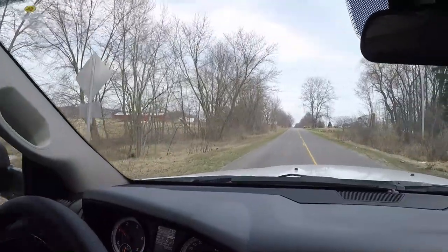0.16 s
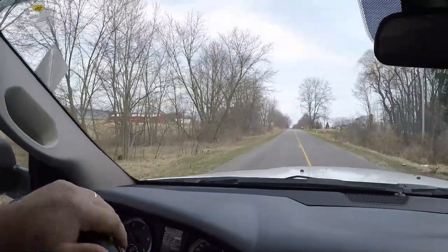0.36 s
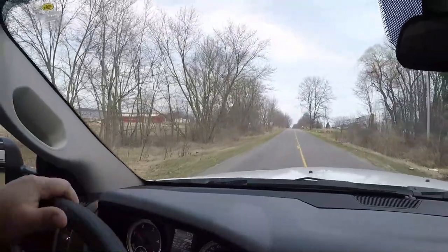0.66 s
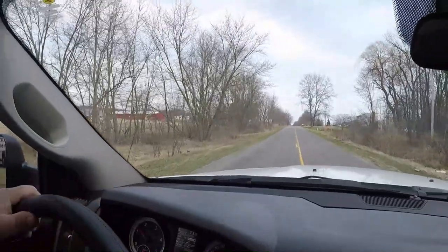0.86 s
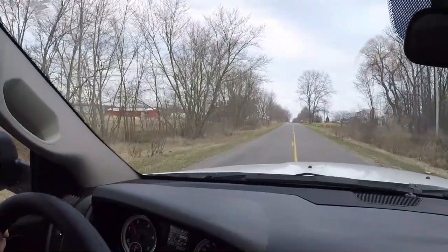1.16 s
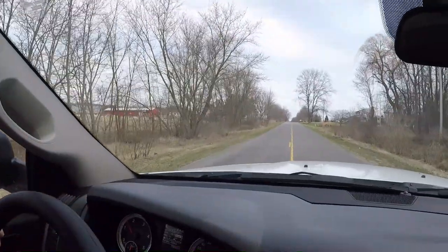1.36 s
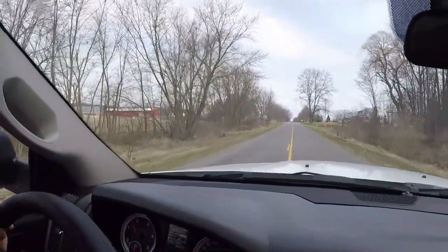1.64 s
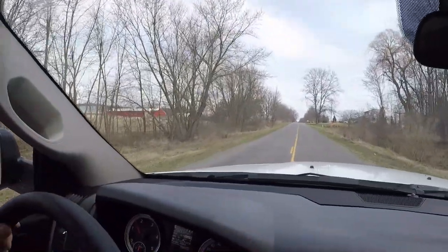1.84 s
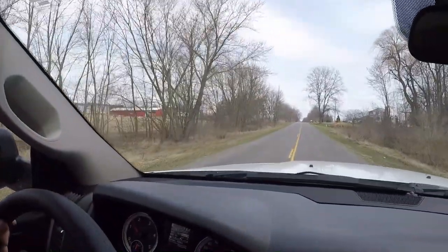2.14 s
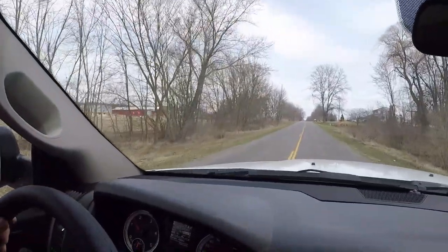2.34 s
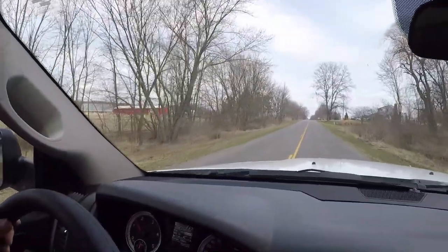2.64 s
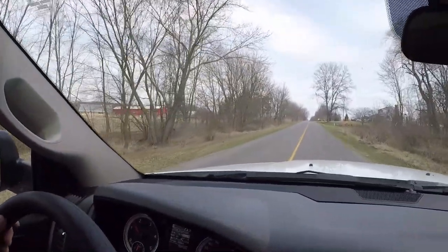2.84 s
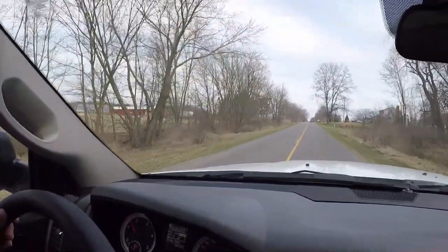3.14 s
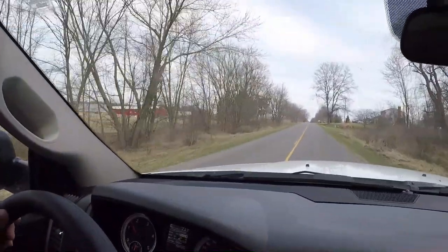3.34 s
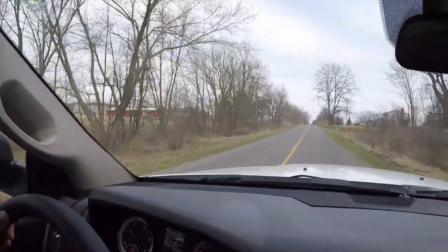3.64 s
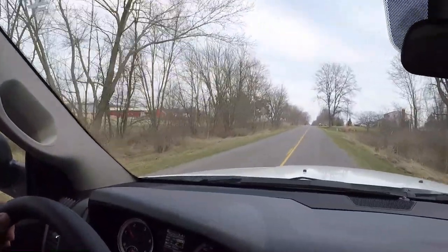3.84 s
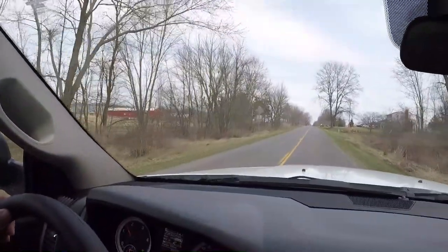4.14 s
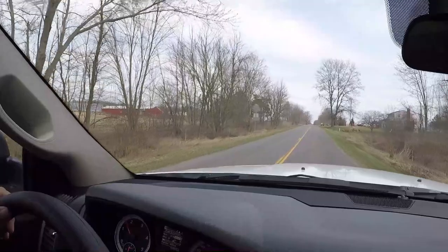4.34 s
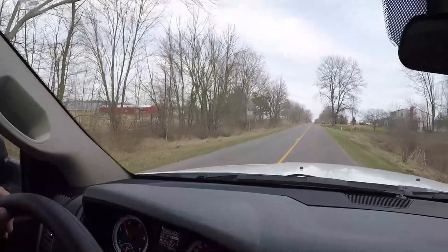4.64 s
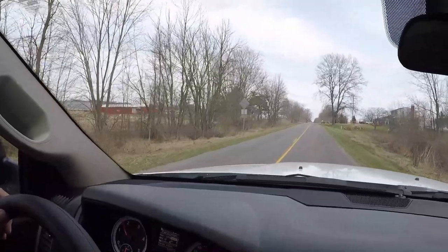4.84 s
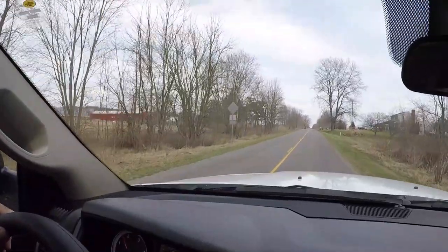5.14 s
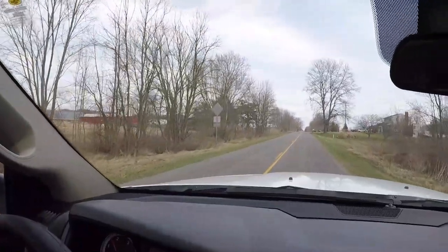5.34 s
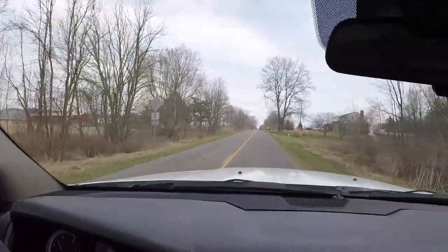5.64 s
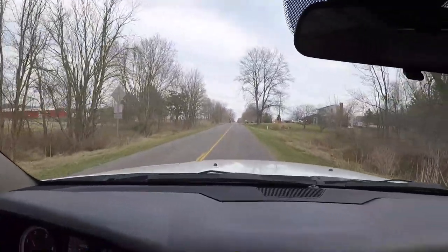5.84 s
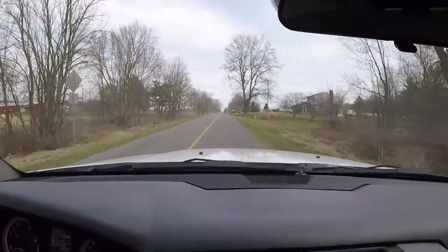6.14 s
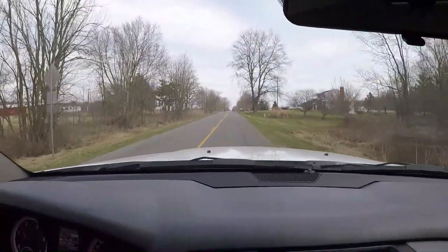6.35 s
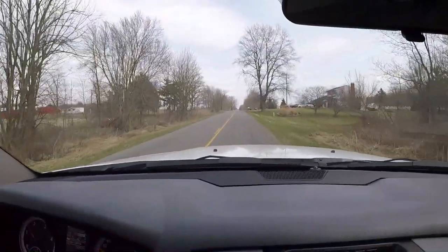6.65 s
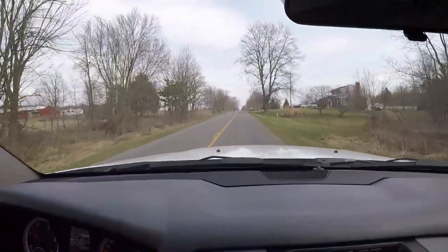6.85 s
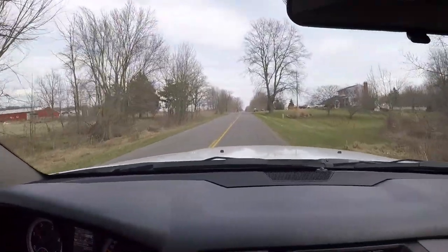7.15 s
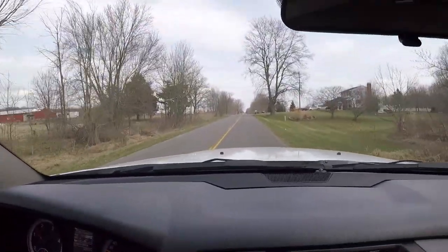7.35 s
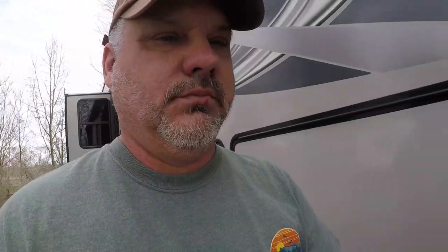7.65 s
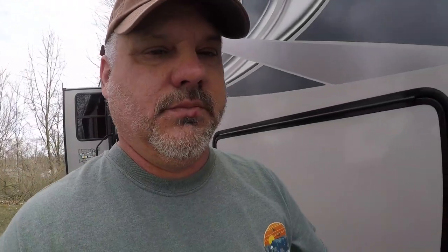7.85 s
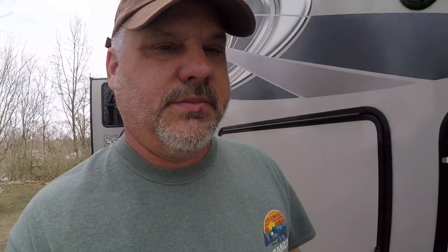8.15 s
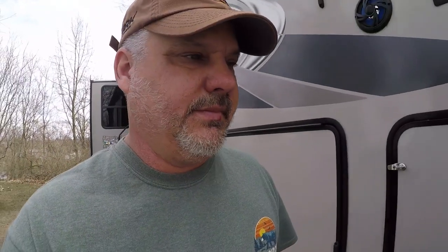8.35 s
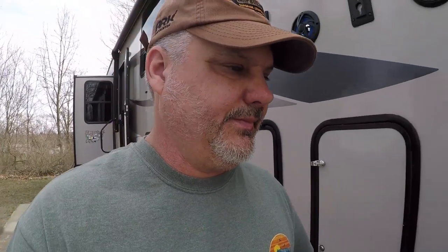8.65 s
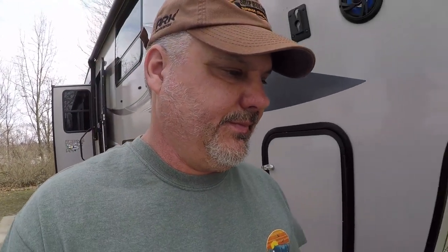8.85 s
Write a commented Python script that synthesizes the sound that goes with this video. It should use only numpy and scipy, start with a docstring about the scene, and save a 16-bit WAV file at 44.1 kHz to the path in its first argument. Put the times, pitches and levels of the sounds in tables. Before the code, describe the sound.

From 0 to about 7.5 s we are inside a pickup cab on pavement, loud and bass-heavy in stereo. The engine's low hum rises until 1.4 s, dips at a gear change, climbs slowly to about 5.4 s, drops again and cruises steadily. Dense tyre rumble and subdued hiss run throughout, with the hiss slightly stronger after 5.7 s. Faint plastic clicks fall between 0.7 and 1.1 s, clearer ones at 2.1, 2.5, 2.6 and 3.0 s, and a small one at 6.7 s. At 2.2 s a rough scuff drags and knocks near the microphone. Low body booms swell irregularly, strongest from 6.2 s; a faint high whine passes around 7.1 s. At 7.5 s a hard cut opens a far quieter mono yard, fading in: soft air, low wind thumps, brighter gusting after 8.4 s, distant falling bird whistles with echoes every quarter second or so, and tiny close ticks around 8.3-8.6 s.

```python
"""Inside the cab of a pickup truck on a paved road: engine tones, tyre rumble, hiss and a booming body.
The engine is sines on multiples of its shaft speed, the road coloured noise, each boom a short low sine.
Plastic clicks ring in short noise bursts, then one rough scuff near the camera drags and knocks; late on,
a faint whine. A hard cut leads to a quiet yard fading in, in mono: noise puffs and thumps of wind, a far
bird of falling sines with an echo, and small ticks."""
import sys
import numpy as np
from scipy import signal
from scipy.io import wavfile
from scipy.ndimage import uniform_filter1d

SR = 44100
rng = np.random.default_rng(int(sys.argv[2]) if len(sys.argv) > 2 else 0)


def log_audio(samples):
    """Write samples as a 16-bit WAV file to the path given in sys.argv[1]."""
    # one column per channel
    frames = np.atleast_2d(samples).T
    # limit to full scale, then quantise
    limited = np.clip(frames, -1, 1)
    pcm = np.round(limited * 32767).astype(np.int16)
    wavfile.write(sys.argv[1], SR, pcm)


def undo_db(level):
    """Turn decibels back into plain size, where 20 dB means ten times bigger."""
    steps = np.asarray(level, float) / 20
    return 10 ** steps


N = 396459
CUT_S = 7.4824  # the cab stops and the yard starts, in seconds

# How the cab's sound leans sideways. Each row: frequency in Hz, left over right in dB.
SIDE_LEAN = [(60, 2.5), (110, 3.5), (200, 2.5), (370, 2.5), (680, -1), (1260, -4.5), (2310, -3),
             (4240, -0.5), (7780, -0.5), (14300, -4.5)]


def evened(x):
    """Scales a sound to rms 1."""
    return x / np.sqrt(np.mean(x ** 2) + 1e-20)


def read(points, hz):
    """Reads a table of (Hz, value) between its rows, along a logarithmic pitch scale."""
    f, value = np.transpose(points)
    return np.interp(np.log(hz + 1), np.log(f + 1), value)


def curve(rows):
    """Draws straight lines in time through each column of a table that starts with seconds."""
    s, *columns = np.transpose(rows)
    return [np.interp(np.arange(N) / SR, s, c) for c in columns]


def add(mix, s, sound):
    """Lays a sound into the mix from second s on."""
    part = mix[..., round(s * SR):][..., :sound.shape[-1]]
    part += sound[..., :part.shape[-1]]


def wander(hz):
    """Slow chance drift: straight lines between random points, hz points a second."""
    knots = rng.standard_normal(300)
    return np.interp(np.arange(N) / SR * hz, np.arange(len(knots)), knots)


def band(x, hz, width):
    """Keeps a band of the given width around hz, with gentle slopes."""
    edges = [max(hz - width / 2, 10), hz + width / 2]
    return signal.sosfilt(signal.butter(1, edges, "band", fs=SR, output="sos"), x)


def twice(x, hz, width):
    """Filters a band twice for steeper slopes and scales it to rms 1."""
    return evened(band(band(x, hz, width), hz, width))


def noise(colour, size, patchy_db, count=N):
    """Stereo noise of a given colour with drifting patches; the mean of both channels has rms 1."""
    # Each row: frequency in Hz, likeness of left and right (1 is identical).
    likeness = [(60, 0.94), (99, 1), (160, 0.94), (270, 0.96), (440, 0.88), (720, 0.13), (1190, 0.07),
                (1950, 0.23), (3210, 0.6), (5290, 0.22), (8690, -0.27), (14300, 0.05)]
    frames, hz = 4 * count // size + 5, np.fft.rfftfreq(size, 1 / SR)
    a, b, c, d, patches = rng.standard_normal((frames, len(hz), 5)).T
    # smooth the patches across frequency, then across time
    patches = uniform_filter1d(patches, size=9, axis=0)
    patches = evened(uniform_filter1d(patches, size=7, axis=1))
    same = np.clip(read(likeness, hz), -1, 1)[:, None]
    left = a + 1j * b
    right = same * left + np.sqrt(1 - same ** 2) * (c + 1j * d)
    lean_db = read(SIDE_LEAN, hz)[:, None] / 2
    z = np.array([left, right]) * undo_db([lean_db, -lean_db])
    # the colour holds for the mean of both channels
    mid_power = undo_db(2 * lean_db) / 2 + undo_db(-2 * lean_db) / 2 + same
    z *= undo_db(read(colour, hz)[:, None] + patchy_db * patches) / np.sqrt(mid_power)
    out = signal.istft(z, nperseg=size, noverlap=3 * size // 4)[1][:, :count]
    return out / np.sqrt(np.mean(out.mean(0) ** 2))


def engine():
    """Sines on multiples of the shaft speed, loudest on a resonance of the cab and under a hard pull."""
    # The engine pulls, drops at two gear changes and cruises. Each row: time in seconds, shaft speed in Hz.
    shaft_speed = [(0, 34.79), (.5, 36.2), (1.2, 40.15), (1.41, 40.4), (1.71, 36.0), (1.87, 36.25),
                   (2.25, 38.7), (3.5, 40.1), (4.5, 40.6), (5.38, 41.85), (5.53, 41.8), (5.8, 38.35),
                   (6.2, 38.6), (7.5, 38.65)]
    # Each row: multiple of the shaft speed, level in dB, shaft speed in Hz where the cab answers best,
    # half width of that resonance in Hz of shaft speed.
    orders = [(2, -20.5, 39.8, 8), (3, -34.5, 39, 5.5), (4, -17, 35.6, 1.96), (5, -33, 41.4, 3),
              (6, -32, 40.3, 1.2), (7, -34, 38, 4.5), (8, -42.5, 32, 4.9), (10, -38, 42.5, 4),
              (11, -46.5, 30, 3), (12, -42.5, 41.2, 2.6), (14, -50, 36, 3), (16, -48, 37.2, 1.9),
              (20, -58, 29, 4.3)]
    flywheel_s = 0.1  # the flywheel smooths the speed over this time
    leak_db = -12.5  # what still reaches the cab away from a resonance
    pull_db, full_pull_hz_per_s = 0.42, 3.5  # a hard pull lifts each order by pull_db times its multiple
    hz = uniform_filter1d(curve(shaft_speed)[0], round(flywheel_s * SR))
    turn = 2 * np.pi * np.cumsum(hz * (1 + 0.0012 * wander(11))) / SR
    pull = np.clip(np.gradient(hz) * SR / full_pull_hz_per_s, 0, 1)
    out = np.zeros((2, N))
    for k, db, best_hz, width in orders:
        resonance = (1 + ((hz - best_hz) / width) ** 2) ** -2.0
        answer_db = 10 * np.log10(resonance + undo_db(2 * leak_db))
        level_db = db + answer_db + pull_db * k * pull + 0.69 * wander(6.1)
        tone = np.sqrt(2) * np.sin(round(k) * turn + 2 * np.pi * rng.random())
        lean_db = read(SIDE_LEAN, best_hz * k) / 2
        out += undo_db([[lean_db], [-lean_db]]) * undo_db(level_db) * tone
    return out


def road():
    """Noise as low shake, tyre rumble and hiss; the last two also ring the tyres' air and the cab panels."""
    # Low shake around the boom. Each row: frequency in Hz, relative strength in dB per Hz.
    shake_colour = [(7.1, -26.5), (12, 10.5), (32, -2.5), (70, -9.5), (91, -35.5), (150, -120)]
    # Tyres heard through the frame. Each row: frequency in Hz, relative strength in dB per Hz.
    rumble_colour = [(29, -41.5), (50, 1), (81, -3.5), (118, -2), (162, -10.5), (185, -16.5), (238, -11),
                     (334, -15), (368, -18), (410, -18), (597, -28.5), (673, -26), (900, -42),
                     (1170, -75.5), (1980, -120)]
    # Tread and airflow. Each row: frequency in Hz, relative strength in dB per Hz.
    hiss_colour = [(410, -31.5), (700, -5), (975, -8.5), (1240, -6.5), (1600, -14.5), (2100, -15.5),
                   (2260, -15.5), (3070, -18.5), (3720, -23.5), (4120, -22.5), (5120, -28), (6040, -23),
                   (7600, -24.5), (12300, -46.5), (14800, -57.5)]
    # How coarse the paving is. Each row: time in seconds, lift of the rumble in dB.
    paving = [(0, -0.5), (2, 1), (4.4, 1.5), (5.4, -0.5), (6.3, 0), (7.5, -0.5)]
    # Tyre air and cab panels. Each row: frequency in Hz, width in Hz, level in dB.
    cavities = [(123, 45, -30.5), (238.7, 42, -38), (328, 34, -44.5), (1159, 78, -58), (3085, 120, -65),
                (7750, 210, -65.5)]
    shake_db, rumble_db, hiss_db = -17.5, -17.5, -38.5
    hiss_follows = 0.52  # share of the paving's dB that the hiss follows
    hiss_sag_db_per_s = -0.2671
    # the microphone turns toward the windscreen and hears more hiss
    turn_s, turn_length_s, turn_db = 5.7, 0.36, 2.1
    t = np.arange(N) / SR
    coarse_db, = curve(paving)
    shake = undo_db(shake_db) * noise(shake_colour, size=8192, patchy_db=0.5)
    rumble_level_db = rumble_db + coarse_db + 0.41 * wander(3)
    rumble = undo_db(rumble_level_db) * noise(rumble_colour, size=4096, patchy_db=0.5)
    turned = np.clip((t - turn_s) / turn_length_s, 0, 1)
    hiss_level_db = hiss_db + hiss_follows * coarse_db + hiss_sag_db_per_s * t
    hiss_level_db += turn_db * turned + 0.5 * wander(10)
    hiss = undo_db(hiss_level_db) * noise(hiss_colour, size=1024, patchy_db=1.05)
    out = shake + rumble + hiss
    for hz, width, db in cavities:
        out += undo_db(db + 1.0 * wander(1.2)) * twice(rumble + hiss, hz, width)
    return out


def boom():
    """Waves in the paving set the body booming on its springs: a swelling and fading low sine for each."""
    # Each row: time of the peak in seconds, peak level in dB, frequency in Hz,
    # time from silence to the peak and again to silence in seconds.
    waves = [(0.875, -19, 26.4, 0.36), (1.148, -26, 29.6, 0.17), (1.805, -16, 28.9, 0.33),
             (2.62, -18, 26.5, 0.26), (3.208, -21.5, 28.6, .4), (3.698, -12, 35.6, 0.12),
             (3.969, -19, 26.4, 0.064), (4.702, -21, 26.8, .4), (4.98, -15.5, 32.06, 0.59),
             (5.556, -18.5, 40.5, 0.45), (5.802, -17.5, 28, 0.61), (6.222, -13.5, 26.3, 0.39),
             (6.532, -11.5, 31.5, 0.29), (6.898, -10.5, 25.85, 0.28), (7.24, -9.5, 24.4, 0.22)]
    out = np.zeros(N)
    for s, db, hz, length in waves:
        u = np.arange(-length, length, 1 / SR)
        tone = np.sqrt(2) * np.sin(2 * np.pi * (hz * u + rng.random()))
        add(out, s - length, undo_db(db) * np.hanning(len(u)) * tone)
    lean_db = SIDE_LEAN[0][1] / 2
    return undo_db([[lean_db], [-lean_db]]) * out


def clicks():
    """A sharp snap, then its scattered reflections in the cab, through the plastic's resonances."""
    # Each row: start in seconds, level in dB, left over right in dB, time to fall by 60 dB in seconds.
    click_rows = [(0.7187, -54, 11, 0.044), (0.7787, -51.5, 10, 0.054), (0.92, -47.5, 3, 0.087),
                  (1.0844, -44.5, -2, 0.045), (2.1326, -35.5, 1, 0.05), (2.5343, -37, 1.5, 0.086),
                  (2.586, -37, 5, 0.054), (3.016, -41.5, 5, 0.08), (6.709, -46.5, 1, 0.071)]
    # Resonances of the plastic. Each row: frequency in Hz, width in Hz, relative level in dB.
    plastic = [(1700, 1400, 0.5), (2900, 1300, -4.5), (3950, 1000, 1.5), (5890, 1100, 4.5),
               (6850, 1000, 3.5), (9770, 2000, -11)]
    out, t = np.zeros((2, N)), np.arange(4410) / SR
    for s, db, lean_db, t60 in click_rows:
        burst = rng.standard_normal((2, len(t)))
        ring = sum(undo_db(mode_db) * twice(burst, hz, width) for hz, width, mode_db in plastic)
        shape = undo_db(db - 60 * t / t60) * np.minimum(t / 0.0007, 1)
        add(out, s, ring * shape * undo_db([[lean_db / 2], [-lean_db / 2]]))
    return out


def scuff():
    """A surface drags in a few jerks: each knocks the mount, with lumpy noise below and grit above."""
    # Each row: peak time in seconds, level in dB, rise before it in seconds, grit over that level in dB.
    jerks = [(2.204, -23, 0.034, -22.5), (2.214, -11.5, 0.0044, -5.5), (2.228, -19, .0069, -0.5),
             (2.242, -14, 0.012, -4), (2.264, -13, 0.0095, -2), (2.282, -23.5, .0034, -5)]
    # The rubbing noise. Each row: frequency in Hz, relative strength in dB per Hz.
    rub_colour = [(90, -40), (150, -13.5), (280, -9.5), (556, -15.5), (830, -20), (1060, -23), (1250, -28),
                  (1550, -26), (2500, -30), (4500, -35.5), (6000, -37), (8500, -36), (10200, -49.5),
                  (12000, -83.5)]
    # Ringing of the camera mount. Each row: frequency in Hz, relative level in dB,
    # time to fall by 60 dB in seconds.
    mount = [(133.5, 2.5, 0.071), (289, -3, 0.062), (537, -11.5, 0.092), (890, -19.5, 0.048),
             (1090, -24.5, 0.2), (1544, -18.5, 0.062), (2060, -25.5, 0.064)]
    jerk_t60_s, knock_db = 0.11, 10.5
    t = np.arange(N) / SR
    ring_s = t[:6000]
    push, grit, knocks = np.zeros(N), np.zeros(N), np.zeros(N)
    for s, db, rise, grit_db in jerks:
        fall_db = 60 * np.clip(t - s, 0, None) / jerk_t60_s
        power = undo_db(db - fall_db) ** 2 * np.clip(1 + (t - s) / rise, 0, 1) ** 2
        push += power
        grit += power * undo_db(grit_db) ** 2
        for hz, mode_db, mode_t60 in mount:
            spread, sway, turn = rng.standard_normal(3)  # no two knocks ring alike
            ring = np.sin(2 * np.pi * (hz * (1 + 0.022 * sway) * ring_s + turn))
            ring *= np.minimum(ring_s / 0.0015, 1)
            add(knocks, s - 0.002, undo_db(db + mode_db + 1.8 * spread - 60 * ring_s / mode_t60) * ring)
    rub = noise(rub_colour, size=256, patchy_db=2.5, count=N // 3)
    rub = np.pad(rub, [(0, 0), (0, N - N // 3)])
    low = signal.sosfiltfilt(signal.butter(2, 3000, fs=SR, output="sos"), rub)
    rubbing = np.sqrt(push) * low + np.sqrt(grit) * (rub - low)
    # the knocks sound alike in both channels, slightly louder on the left
    return rubbing + undo_db(knock_db) * knocks * undo_db([[1], [-1]])


def whine():
    """A faint high sine of unsteady pitch and level that comes and goes."""
    pitch_hz, level_db, middle_s, half_length_s = 4650, -57, 7.08, 0.25
    t = np.arange(N) / SR
    shape = np.exp(-((t - middle_s) / half_length_s) ** 4) * undo_db(3 * wander(20))
    return undo_db(level_db) * shape * np.sin(2 * np.pi * np.cumsum(pitch_hz + 20 * wander(30)) / SR)


def far_air():
    """Far air and leaves: steady coloured noise."""
    # Each row: frequency in Hz, relative strength in dB per Hz.
    air_colour = [(120, -40), (200, -3), (301, -23), (561, -18), (759, -21.5), (3200, -31.5), (9640, -43.5),
                  (11900, -43), (14000, -74)]
    air_db = -62.5
    air = evened(noise(air_colour, size=1024, patchy_db=-0.5, count=N // 4)[0])
    return undo_db(air_db) * np.pad(air, (N - N // 4, 0))  # only the last quarter is needed


def wind():
    """Low lumpy noise on the microphone that a gust brightens, and short thumps where an eddy hits it."""
    # Each row: time of the middle in seconds, peak level in dB, frequency in Hz, length in cycles.
    thumps = [(7.581, -24, 36, 1.4), (7.694, -18, 60, 0.49), (7.722, -24.5, 90, 1.4),
              (7.83, -23.5, 45, 4.2), (7.859, -15.5, 80, 0.24), (7.945, -18.5, 58, 1.6),
              (8.212, -42, 171, 1.2), (8.391, -20, 65, 1.14), (8.463, -27, 90, 0.88),
              (8.542, -27, 40.2, 1.7), (8.566, -22, 70, 0.95), (8.627, -23.5, 90, 0.82),
              (8.644, -24, 160, 1.9), (8.748, -29, 150, 0.65), (8.86, -29, 75, 1.8), (8.876, -28, 175, 2.3),
              (8.969, -26.5, 70, 0.91)]
    wind_db, lumpy_db = -40, 2.5
    upper_db = -20  # upper part over the low part
    gust_s, gust_rise_s, gust_db, gust_upper_db = 8.36, 0.15, -0.5, 10
    gust = np.clip((np.arange(N) / SR - gust_s) / gust_rise_s, 0, 1)
    low = twice(rng.standard_normal(N), 50, 45.4)
    upper = twice(rng.standard_normal(N), 170, 137)
    level_db = wind_db + gust_db * gust + lumpy_db * wander(25)
    out = undo_db(level_db) * (low + undo_db(upper_db + gust_upper_db * gust) * upper)
    for s, db, hz, cycles in thumps:
        turns = np.arange(-1.5 * cycles, 1.5 * cycles, hz / SR)
        swell = np.exp(-2 * (turns / cycles * 1.44) ** 2)
        thump = swell * np.cos(2 * np.pi * (turns + rng.integers(2) / 2))  # pushes or pulls by chance
        add(out, s + turns[0] / hz, undo_db(db) * thump)
    return out


def bird():
    """Falling whistles, each with an echo off a wall, roughened by distance and smeared by reflections."""
    # Each row: start in seconds, level in dB, echo over the whistle in dB.
    whistles = [(7.58, -75, -1), (7.85, -75, 4), (8.12, -75, 6), (8.394, -76, 7), (8.675, -72.5, 5),
                (8.955, -68, 0)]
    echo_s, whistle_s = 0.033, 0.108
    top_hz, aim_hz, fall_s, end_hz = 5900, 2000, 0.056, 2640  # falls toward aim_hz but rests on end_hz
    end_db = 4  # growth in level toward the end
    t, out = np.arange(0, whistle_s, 1 / SR), np.zeros(N)
    hz = np.maximum(aim_hz + (top_hz - aim_hz) * np.exp(-t / fall_s), end_hz)
    tone = np.sin(2 * np.pi * np.cumsum(hz) / SR)
    shape = undo_db(end_db * (t / whistle_s) ** 4) * signal.windows.tukey(len(t), 0.12)
    for start, db, echo_db in whistles:
        for delay, gain_db in [(0, db), (echo_s, db + echo_db)]:
            flutter = 1 + 0.55 * evened(uniform_filter1d(rng.standard_normal(len(t)), 100))
            add(out, start + delay, tone * flutter * undo_db(gain_db) * shape)
    # many small reflections: noise that falls by 60 dB in 0.32 s
    lag = np.arange(SR // 4) / SR
    smear = rng.standard_normal(len(lag)) * undo_db(-60 * lag / 0.32)
    return out + undo_db(-4.0) * signal.oaconvolve(out, smear / np.linalg.norm(smear))[:N]


def ticks():
    """Small ticks and rustles close by: bursts of band noise that die away."""
    # Each row: start in seconds, level in dB, frequency in Hz, width in Hz,
    # time to fall by 60 dB in seconds.
    tick_rows = [(8.312, -59, 1150, 150, 0.034), (8.315, -60.5, 1590, 200, 0.058),
                 (8.536, -59, 6070, 3000, .02), (8.56, -62.5, 4070, 2500, 0.11),
                 (8.625, -59, 2000, 2000, 0.037)]
    out, t = np.zeros(N), np.arange(4410) / SR
    for s, db, hz, width, t60 in tick_rows:
        burst = evened(band(rng.standard_normal(len(t)), hz, width))
        add(out, s, burst * undo_db(db - 60 * t / t60))
    return out


def yard():
    """Air, wind, bird and ticks, the same in both channels, under one fade-in."""
    # opens quickly, then climbs until full_s
    open_s, climb_db_per_s, full_s = 0.072, 13.5, 8.67
    now = np.arange(N) / SR
    opening = np.clip((now - CUT_S) / open_s, 0, 1)
    climb = undo_db(climb_db_per_s * np.minimum(now - full_s, 0))
    return (far_air() + wind() + bird() + ticks()) * opening * climb


def scene():
    """Plays the cab, then cuts hard to the yard."""
    cut_fade_s = 0.00008
    in_cab = np.clip((CUT_S - np.arange(N) / SR) / cut_fade_s, 0, 1)
    cab = engine() + road() + boom() + clicks() + scuff() + whine()
    return in_cab * cab + (1 - in_cab) * yard()


def roll_off(x):
    """The treble ends steeply here."""
    return signal.sosfilt(signal.butter(12, 14900, fs=SR, output="sos"), x)


def record(dry):
    """Gain control holds down the loudest swings and recovers slowly; a soft knee rounds the peaks."""
    threshold_db, recovery_db_per_s, hold_share = -10, 4.8, 0.48
    power_db = 10 * np.log10(abs(uniform_filter1d((dry ** 2).mean(0), 300)) + 1e-12)
    # the highest power so far, sinking at the recovery speed
    fall = np.arange(N) * recovery_db_per_s / SR
    held_db = np.maximum.accumulate(power_db + fall) - fall
    over_db = np.maximum(held_db - threshold_db, 0)
    held = dry / undo_db(hold_share * uniform_filter1d(over_db, 200))
    return roll_off(1.174 * np.tanh(held / 1.06))


dry = scene()
out = record(dry)
log_audio(out)
```